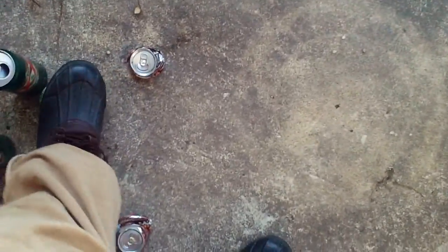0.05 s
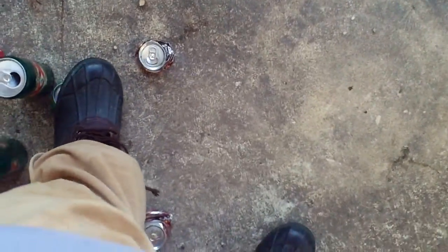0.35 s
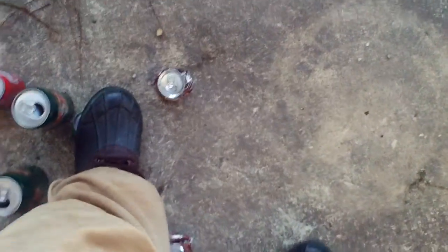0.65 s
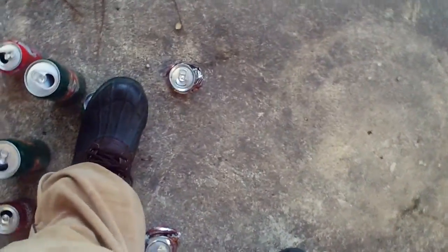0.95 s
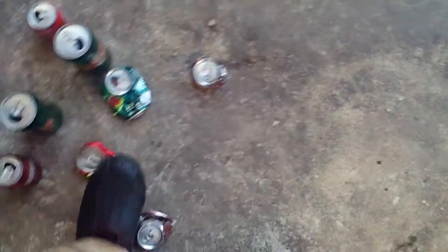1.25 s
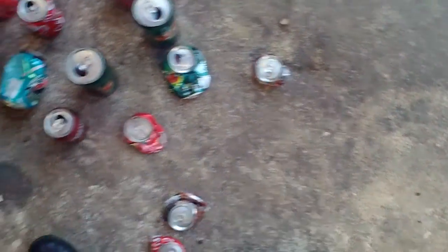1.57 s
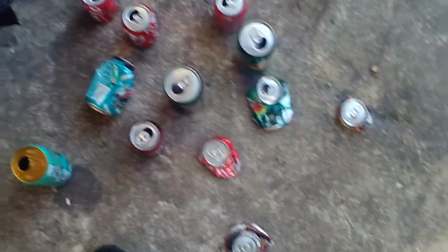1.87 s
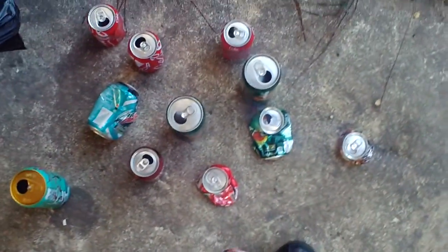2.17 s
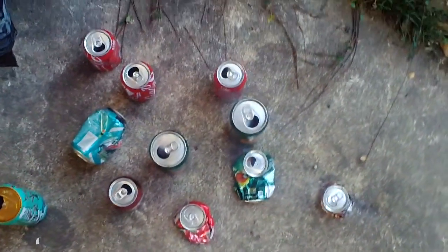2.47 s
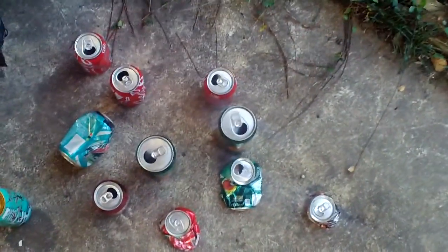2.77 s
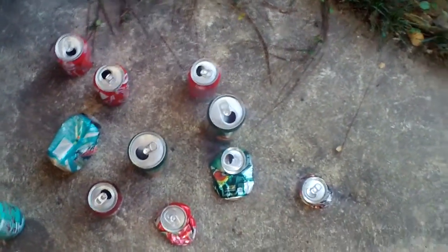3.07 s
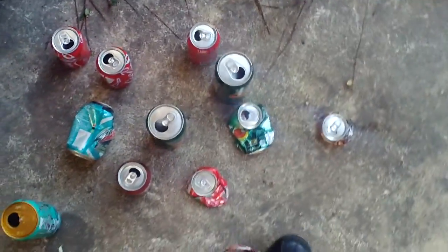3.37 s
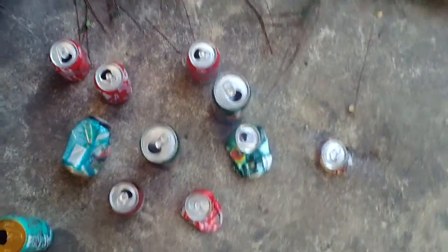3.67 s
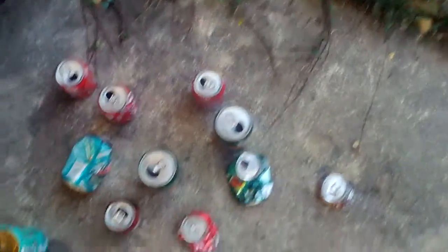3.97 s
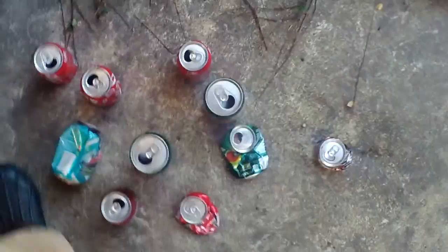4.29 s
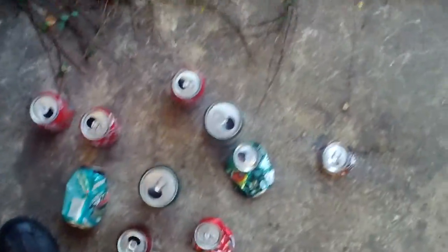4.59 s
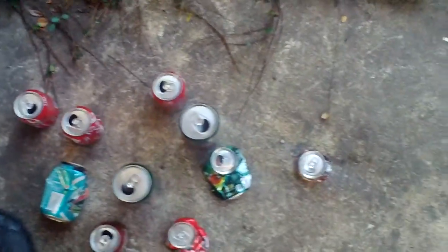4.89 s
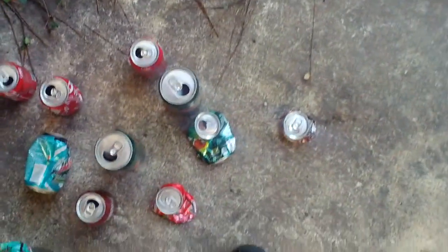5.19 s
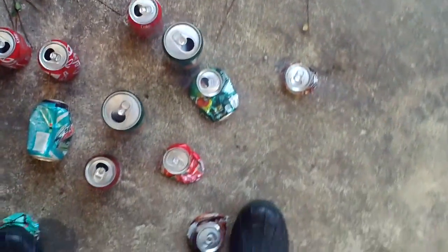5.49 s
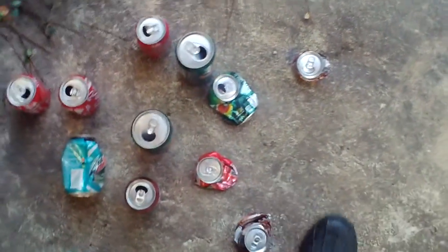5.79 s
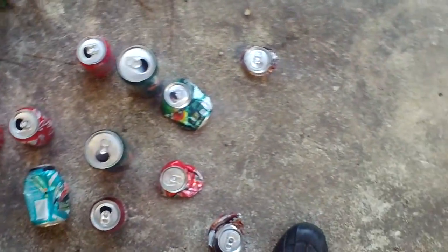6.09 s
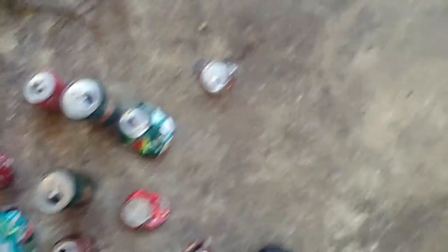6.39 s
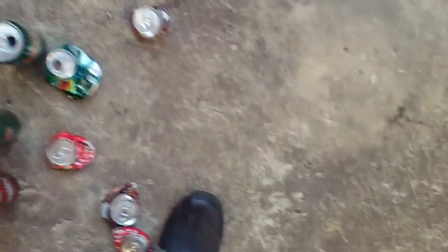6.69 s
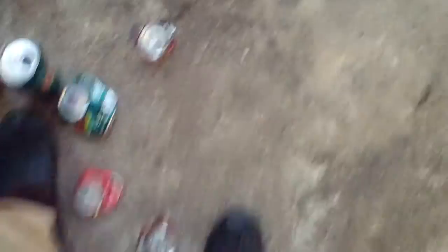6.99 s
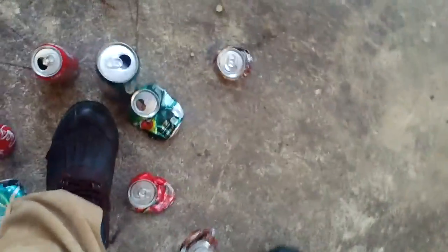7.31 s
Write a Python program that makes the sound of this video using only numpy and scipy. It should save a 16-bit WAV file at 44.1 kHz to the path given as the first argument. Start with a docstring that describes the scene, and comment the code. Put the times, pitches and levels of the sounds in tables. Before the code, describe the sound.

In the first half second, empty aluminium cans clunk, scrape and crackle under a boot on concrete, close by and with a slight echo. Smaller pops and gritty scuffs follow until about 1.2 seconds. It then turns quieter, with a small crinkle at 2.1 and a short scrape around 3.5. At 4.2 a stamp lands with a thump and a loud crunch, its hollow pops rising in pitch as the can collapses. Light ticks and dents follow, then a scuff and a clunk between 6.2 and 6.5. A second loud stamp crunches from 6.8 to 7, and the flattened can clinks several times until 7.3. Farther off, over a soft outdoor hush, one songbird repeats a short whistled phrase during the first second and again from 4.4 to 6. Another gives rising whistles, about four a second, from 1.4 to 4.

```python
"""Cans crushed on a patio

A boot kicks, scrapes and stamps flat empty aluminium cans on concrete. Each buckle of the thin wall is
a hollow pop, a crack and a bright tick; a stamp runs many together, rising in pitch as the can shortens.
Whole cans clunk and ring as they rock on the slab; a flattened one clinks. The surroundings echo a
little, and two songbirds whistle over the hush of the yard."""
import sys
import numpy as np
from scipy import signal
from scipy.fft import rfft, irfft
from scipy.io import wavfile
from scipy.ndimage import uniform_filter1d, minimum_filter1d

SR = 44100
rng = np.random.default_rng(int(sys.argv[2]) if len(sys.argv) > 2 else 0)


def bounce(signal):
    """Save signal as a 16-bit WAV file at the path given by the first command-line argument."""
    frames = np.transpose(np.atleast_2d(signal))
    limited = np.clip(frames, -1, 1)
    pcm = np.round(limited * 32767).astype(np.int16)
    wavfile.write(sys.argv[1], SR, pcm)


N = 328545
ATTACK_SAMPLES = 265  # a blow's level is set over this span

# pop spectrum: pitch_ratio, gain_db
POP_SPECTRUM = [(.1, -56.5), (.45, -15.5), (.78, -3), (1, 3.5), (1.251, -3), (1.9, -9), (3.2, -35)]
# crack spectrum of a crease: freq_hz, gain_db
CRACK_SPECTRUM = [(300, -37), (1650, 1), (2150, 5.5), (2900, 6.5), (4500, 3.5), (6500, -5.5), (16000, -75)]
# tick spectrum of its sharp edge: freq_hz, gain_db
TICK_SPECTRUM = [(500, -75), (3800, -4), (5400, -3.5), (7500, 1), (9000, -2), (10500, -3), (14000, -12),
                 (15500, -35.5)]


def amp(db):
    """Decibels to gain."""
    return 10 ** (np.asarray(db) / 20)


def unit_rms(x):
    """Each row scaled to rms 1."""
    return x / np.sqrt(np.mean(x ** 2, axis=-1, keepdims=True) + 1e-20)


def log_lookup(points, freq):
    """Table value on a log frequency axis."""
    freqs, values = np.transpose(points)
    return np.interp(np.log(freq + 1e-6), np.log(freqs), values)


def add(mix, start_s, sound):
    """Mix a sound in, cut at the end of the mix."""
    part = mix[max(round(start_s * SR), 0):][:len(sound)]
    part += sound[:len(part)]


def colour(x, spectrum, unit_hz=1, size=2048):
    """Minimum-phase filter: sharp attack, ringing after it."""
    freq_hz = abs(np.fft.fftfreq(size, 1 / SR))
    log_gain = np.log(amp(log_lookup(spectrum, freq_hz / unit_hz)))
    response = np.fft.ifft(np.exp(np.conj(signal.hilbert(log_gain)))).real
    return signal.fftconvolve(x, response)[:len(x)]


def ringing(modes, unit_hz=1, samples=SR // 4):
    """Struck modes, each with its own decay."""
    t = np.arange(samples) / SR
    return sum(amp(db - 60 * t / t60_s) * np.cos(2 * np.pi * unit_hz * freq * t)
               for freq, db, t60_s in modes)


def jolt(decay_s, rattle_db, rattle_s, size=4096):
    """One impulse, a quick shiver of the wall and a weak lingering rattle."""
    t = np.arange(size) / SR
    envelope = np.exp(-t / decay_s) + amp(rattle_db) * np.exp(-t / rattle_s)
    return rng.standard_normal(size) * envelope + 3 * (t == 0)


def slip_train(samples, rate_hz, spread_db):
    """Unevenly spaced impulses, most small, a few large; then 50 ms of silence."""
    jitter, chance, side = rng.random((3, 60))
    at = ((np.arange(len(jitter)) + jitter) / rate_hz * SR).astype(int)
    heights = amp(-spread_db * np.log(chance + .05)) * np.sign(side - .5)
    slips = np.zeros(samples + SR // 20)
    slips[at[at < samples]] = heights[at < samples]
    return slips


def reflect(x, echo_db=-10, decay_s=0.013, count=60):
    """Sound plus early reflections off nearby surfaces, new for each event."""
    delay_s = rng.uniform(.003, .04, count)
    taps = np.zeros(SR // 20)
    taps[(delay_s * SR).astype(int)] = rng.choice([-1, 1], count) * np.exp(-delay_s / decay_s)
    taps *= amp(echo_db) / np.linalg.norm(taps)
    taps[0] = 1
    return signal.fftconvolve(x, taps)


def hush(level_db=-46, drift_db=1.17):
    """Distant outdoor noise, drifting gently in level."""
    # noise spectrum: freq_hz, density_db
    density = [(20, -50), (30, -27), (170, -15), (584, 0), (1100, -1.5), (1280, -7), (1960, -12),
               (3140, -17.5), (5310, -22), (8080, -19.5), (15000, -29.5)]
    spectrum = rfft(rng.standard_normal(N)) * amp(log_lookup(density, np.fft.rfftfreq(N, 1 / SR)))
    t = np.arange(N) / SR
    drift = sum(np.sin(2 * np.pi * (hz * t + rng.random())) / np.sqrt(hz)
                for hz in np.geomspace(.5, 10, 12))
    return amp(level_db + drift_db * unit_rms(drift)) * unit_rms(irfft(spectrum, N))


def scrapes(bite_s=0.0039, ease_db=-6):
    """A rim catches on grit and sets the can humming; the sole bites, then eases."""
    # strokes of the sole: start_s, length_s, pitch_hz, hum_db, tick_db
    strokes = [(0.004, 0.16, 910, -39.5, -54), (0.195, 0.34, 1120, -40, -48.5),
               (0.663, 0.019, 1080, -41.5, -34.5), (0.744, 0.048, 1190, -39.5, -39.5),
               (1.111, 0.092, 1130, -40, -53.5), (2.121, 0.085, 1160, -36.5, -61),
               (3.435, 0.081, 1240, -32.5, -38), (3.491, 0.034, 1230, -31.5, -36),
               (3.521, 0.062, 1270, -37.5, -50), (6.212, 0.093, 1160, -35.5, -51.5),
               (6.675, 0.096, 620, -44, -55)]
    # grating can spectrum: pitch_ratio, gain_db
    hum_spectrum = [(.1, -47), (.45, -15.5), (1, -1), (1.45, -8.5), (1.85, -4), (2.6, -17), (6, -19),
                    (12, -49)]
    out = np.zeros(N)
    for start_s, length_s, pitch_hz, hum_db, tick_db in strokes:
        slips = sum(slip_train(round(length_s * SR), rate_hz=120, spread_db=3.5) for _ in range(4))
        t = np.arange(len(slips)) / SR
        grit = signal.fftconvolve(slips, jolt(.0007, -20, .007))[:len(t)]
        parts = np.array([colour(slips, hum_spectrum, pitch_hz), colour(grit, TICK_SPECTRUM)])
        parts = unit_rms(parts) * np.sqrt(t[-1] / length_s)
        pressure = np.minimum(t / bite_s, 1) * amp(ease_db * (np.minimum(t / length_s, 1) - .5))
        add(out, start_s, reflect(amp([hum_db, tick_db]) @ parts * pressure))
    return out


def knocks():
    """A whole can rocks on the slab: a blunt clunk, and the shell rings on."""
    # contacts: start_s, pitch_hz, level_db
    contacts = [(0.014, 700, -19), (0.051, 850, -2), (0.1489, 1390, -10.5), (0.315, 1330, -4.5),
                (0.3231, 1376, -2.5), (6.4687, 978, -11.5), (6.5078, 950, -18.5)]
    # clunk spectrum: pitch_ratio, gain_db
    clunk_spectrum = [(.15, -49), (.55, -11.5), (1, -1), (1.3, -12), (2.2, -15.5), (9, -38.5)]
    # shell modes: freq_hz, level_db, t60_s
    shell_modes = [(434, -41, 0.17), (846, -38.5, 0.028), (1190, -41, 0.064), (1410, -38, 0.077)]
    out, blow = np.zeros(N), ringing(shell_modes)
    blow[0] += 1
    for start_s, pitch_hz, level_db in contacts:
        clunk = colour(blow, clunk_spectrum, pitch_hz)
        add(out, start_s, reflect(amp(level_db) * clunk / abs(clunk).max(), echo_db=-5))
    return out


def pop(drive, pitch_hz):
    """The hollow body answers a jolt with a blunt pop; its modes ring on."""
    # body modes: pitch_ratio, level_db, t60_s
    body_modes = [(0.528, -22, 0.048), (0.998, -25, 0.073), (1.681, -23, 0.12)]
    ring = ringing(body_modes, pitch_hz, SR // 10)
    blunt = colour(signal.unit_impulse(len(ring)), POP_SPECTRUM, pitch_hz)
    return signal.fftconvolve(drive, blunt / abs(blunt).max() + ring)[:len(drive)]


def buckle_gains(pop_db, tick_db, crack_growth=1.196):
    """Gains of pop, crack and tick; the crack grows with the other two."""
    crack_db = 3.5 + crack_growth * (pop_db + tick_db) / 2
    return amp([pop_db, crack_db, tick_db])


def stutter(x, lead_s, slip_db=-16, count=6):
    """A dent gives in steps: small slips around a main one at lead_s."""
    slips = np.zeros(SR // 30)
    slips[rng.integers(0, len(slips), count)] = amp(slip_db) * rng.standard_normal(count)
    slips[int(lead_s * SR)] = 1
    return signal.fftconvolve(x, slips)[:len(x)]


def buckles(lead_s=.005):
    """Each buckle pops the body, cracks a crease and ticks at its edge."""
    # single buckles: start_s, pitch_hz, pop_db, tick_db
    dents = [(0.023, 858, -7, -28), (0.119, 1150, -26.5, -36), (0.2099, 860, -21.5, -20.5),
             (0.2248, 910, -20.5, -16), (0.3176, 1247, -17.5, -36), (0.359, 1190, -24, -24),
             (0.3997, 980, -24.5, -17.5), (0.42, 1193, -14, -12), (0.4413, 1576, -21.5, -21),
             (0.7086, 976, -22.5, -25.5), (0.7393, 1064, -19.5, -23.5), (0.822, 1110, -38.5, -28.5),
             (1.0458, 1400, -28.5, -29), (1.105, 1153, -20, -34), (1.1571, 1290, -26.5, -44),
             (1.5681, 410, -38.5, -86), (2.117, 1305, -24.5, -30.5), (2.18, 1290, -26, -42),
             (4.2049, 985, -13.5, -34), (4.214, 710, -9.5, -12), (4.2524, 1240, -19, -18),
             (4.2875, 795, -8, -28), (4.305, 1013, -10, -19), (4.326, 1120, -15, -26),
             (4.37, 1186, -11.5, -24.5), (4.481, 900, -33.5, -26), (4.971, 856, -30.5, -45),
             (5.0098, 804, -26, -66), (5.363, 967, -22, -38), (5.38, 880, -41, -16),
             (5.4283, 980, -31.5, -24), (5.714, 696, -33, -81), (6.303, 1204, -25.5, -37),
             (6.428, 736, -25.5, -32.5), (6.8055, 1100, -10, -18), (6.9035, 1390, -18, -14.5),
             (6.93, 2640, -8, -15), (7.006, 1900, -10.5, -17)]
    out = np.zeros(N)
    for start_s, pitch_hz, pop_db, tick_db in dents:
        parts = np.array([pop(jolt(.0001, -33.5, .0087), pitch_hz),
                          colour(jolt(.0022, -17, .028), CRACK_SPECTRUM),
                          colour(jolt(.0018, -14, .015), TICK_SPECTRUM)])
        gains = buckle_gains(pop_db, tick_db) / parts[:, :ATTACK_SAMPLES].std(axis=1)
        body, crack, tick = gains[:, None] * parts
        add(out, start_s - lead_s, reflect(stutter(body, lead_s)))
        add(out, start_s, reflect(crack + tick))
    return out


def bird_note(name, top_hz=None, waver=0.009):
    """A near-pure gliding whistle that swells or fades; top_hz overrides its end pitch."""
    # glides by name: length_s, first_hz, last_hz, bend_exponent, swell_db
    glides = {"sweep": (.092, 2200, 4200, 3.2, 7), "hold": (.045, 3110, 2940, 1, 1),
              "flick": (.026, 3000, 3880, .6, 5), "tea": (.07, 2610, 2830, .7, 3),
              "lift": (.062, 2040, 2620, 1, 10), "slide": (.13, 2530, 3040, 1, -4)}
    length_s, first_hz, last_hz, bend, swell_db = glides[name]
    progress = np.linspace(0, 1, round(length_s * SR))
    pitch_hz = first_hz + ((top_hz or last_hz) - first_hz) * progress ** bend
    pitch_hz *= 1 + waver * unit_rms(uniform_filter1d(rng.standard_normal(len(progress)), size=150))
    whistle = np.sqrt(2) * np.sin(2 * np.pi * np.cumsum(pitch_hz) / SR)
    envelope = amp(swell_db * (progress - 1)) * signal.windows.tukey(len(progress), 0.15)
    return reflect(envelope * whistle, echo_db=-6, decay_s=0.035)


def birds(sweep_db=-51.5):
    """One bird rolls a short phrase, the other repeats rising sweeps; one faint call follows."""
    # lone call: start_s, note_name, level_db
    calls = [(6.548, "slide", -61)]
    # rising sweeps: start_s, top_hz
    sweeps = [(1.375, 4010), (1.618, 4240), (1.873, 4540), (2.115, 4100), (2.359, 4270), (2.617, 4080),
              (2.87, 4230), (3.121, 4000), (3.39, 3900), (3.65, 4150), (3.91, 4180)]
    # repeats of the phrase: start_s, level_db
    repeats = [(0.059, -42), (0.396, -42), (0.735, -42), (4.446, -47.5), (4.779, -45.5), (5.117, -45.5),
               (5.447, -44.5), (5.789, -45.5)]
    # notes of the phrase: offset_s, note_name, gain_db
    phrase = [(0, "hold", -9), (.04, "flick", -2), (0.107, "tea", -4.5), (0.207, "lift", -2.5)]
    out = np.zeros(N)
    for start_s, name, level_db in calls:
        add(out, start_s, amp(level_db) * bird_note(name))
    for start_s, top_hz in sweeps:
        add(out, start_s, amp(sweep_db) * bird_note("sweep", top_hz))
    for start_s, level_db in repeats:
        for offset_s, name, gain_db in phrase:
            add(out, start_s + offset_s, amp(level_db + gain_db) * bird_note(name))
    return out


def thumps():
    """The boot's weight lands through the can."""
    # landings: start_s, pitch_hz, level_db
    landings = [(4.213, 420, -11), (6.802, 390, -13.5)]
    out = np.zeros(N)
    for start_s, pitch_hz, level_db in landings:
        thump = colour(jolt(.00019, -25.5, .0034), POP_SPECTRUM, pitch_hz)
        add(out, start_s, amp(level_db) * thump / thump[:ATTACK_SAMPLES].std())
    return out


def crunch(length_s, pitch_hz, scatter=.22, patches=4):
    """Wall patches fold at once, each at its own pitch. Equal-power rows: pops, cracks, ticks."""
    samples, parts = round(length_s * SR), 0
    for _ in range(patches):
        slips = slip_train(samples, rate_hz=110, spread_db=5)
        dull = signal.fftconvolve(slips, jolt(.0002, -34, .006))[:len(slips)]
        sharp = signal.fftconvolve(slips, jolt(.0009, -20, .007))[:len(slips)]
        pops = pop(dull, pitch_hz * np.exp(scatter * rng.standard_normal()))
        parts = parts + np.array([pops, colour(sharp, CRACK_SPECTRUM), colour(sharp, TICK_SPECTRUM)])
    return unit_rms(parts) * np.sqrt(len(slips) / samples)


def ring_folds(drive, ring_db=0):
    """Sound plus the ring it excites in a flattened can's stiff folds."""
    # fold modes: freq_hz, level_db, t60_s
    fold_modes = [(2420, -48, 0.027), (4610, -51, .04), (5270, -46, 0.05), (6470, -41, 0.063)]
    return drive + amp(ring_db) * signal.fftconvolve(drive, ringing(fold_modes))[:len(drive)]


def stamps(tall_hz=620, rise_octaves_per_s=6.57, stage_s=0.023, pop_trim_db=-4.5, tick_trim_db=-2.5):
    """The can collapses in stages under the boot; its shrinking body pops ever higher."""
    # level curve of each stamp: time_s, pop_db, tick_db
    curves = [
        [(4.213, -20, -11), (4.217, -24, -16), (4.241, -38.5, -34), (4.259, -19.5, -20), (4.327, -21.5, -35),
         (4.345, -29, -37), (4.368, -32, -36)],
        [(6.803, -13, -33), (6.809, -29, -5), (6.819, -29, -30), (6.829, -19.5, -19), (6.865, -17.5, -17.5),
         (6.925, -36.5, -35.5), (6.931, -41, -24), (6.977, -19, -10.5), (6.995, -39, -46), (7.002, -36, -32),
         (7.009, -16, -14), (7.019, -23.5, -20)],
    ]
    # fold ring of each can: gain_db
    rings_db = [-10.5, 1]
    out = np.zeros(N)
    for curve, ring_db in zip(curves, rings_db):
        time_s, pop_db, tick_db = np.transpose(curve)
        stages = round((time_s[-1] - time_s[0]) / stage_s)
        edges_s = np.linspace(time_s[0], time_s[-1], stages + 1)
        for start_s, end_s in zip(edges_s, edges_s[1:]):
            pitch_hz = tall_hz * 2 ** (rise_octaves_per_s * (start_s - time_s[0]))
            parts = crunch(end_s - start_s, pitch_hz)
            t = start_s + np.arange(parts.shape[1]) / SR
            gains = buckle_gains(np.interp(t, time_s, pop_db) + pop_trim_db,
                                 np.interp(t, time_s, tick_db) + tick_trim_db)
            add(out, start_s, reflect(ring_folds((gains * parts).sum(axis=0), ring_db)))
    return out


def clinks():
    """The flattened can slaps the slab and clatters as the boot lifts."""
    # contacts: start_s, level_db
    contacts = [(7.0217, -8), (7.165, -14.5), (7.2749, -13.5), (7.304, -17.5), (7.3167, -20.5)]
    out = np.zeros(N)
    for start_s, level_db in contacts:
        blow = jolt(.0016, -19.5, .017)
        clink = ring_folds(colour(blow, TICK_SPECTRUM) + amp(-10.5) * colour(blow, CRACK_SPECTRUM))
        add(out, start_s, reflect(amp(level_db) * clink / clink[:ATTACK_SAMPLES].std()))
    return out


def patio_echo(x, rise_s):
    """Scattered echoes from wall and garden; treble dies first."""
    # decay times: freq_hz, t60_s
    decays = [(700, 0.75), (1800, 0.45), (4500, 0.39), (15000, 0.29)]
    freq_hz, t, noise = signal.stft(rng.standard_normal(SR), SR, nperseg=256)
    envelope = amp(-60 * t / log_lookup(decays, freq_hz)[:, None]) * (1 - np.exp(-t / rise_s))
    tail = signal.istft(noise * envelope, SR, nperseg=256)[1]
    return signal.fftconvolve(x, tail / np.linalg.norm(tail))[:N]


def scene(bass_edge_hz=120):
    """Cans close by, birds far off, yard hush; mono."""
    cans = buckles() + thumps() + knocks() + clinks() + scrapes() + stamps()
    # thin cans radiate little bass
    cans = signal.sosfilt(signal.butter(2, bass_edge_hz, "high", fs=SR, output="sos"), cans)
    song = birds()
    near = cans + amp(-17.5) * patio_echo(cans, rise_s=0.0016)
    far = amp(5) * (song + .55 * patio_echo(song, rise_s=0.01))
    return (near + far + hush())[None]


def record(dry, ceiling=.84, window_samples=45, cutoff_hz=15550):
    """Fast peak limiter, then low-pass."""
    needed_gain = ceiling / np.maximum(abs(dry), ceiling)
    gain = uniform_filter1d(minimum_filter1d(needed_gain, window_samples), window_samples)
    lowpass = signal.firwin(255, cutoff_hz, window=("kaiser", 9), fs=SR)
    return signal.oaconvolve(dry * gain, lowpass[None], "same")


dry = scene()
out = record(dry)
bounce(out)
```